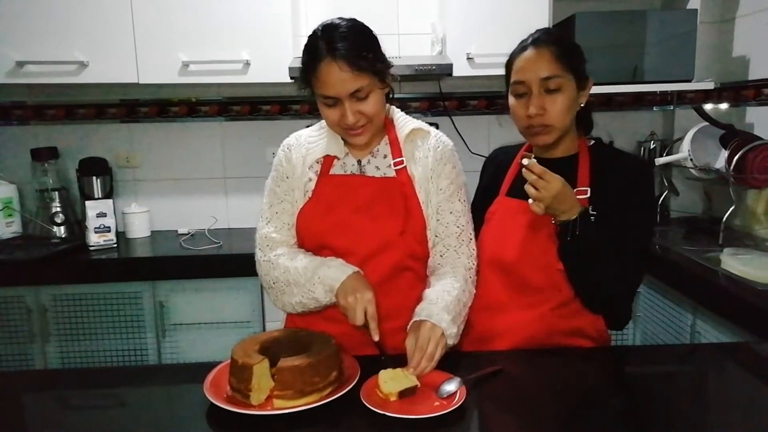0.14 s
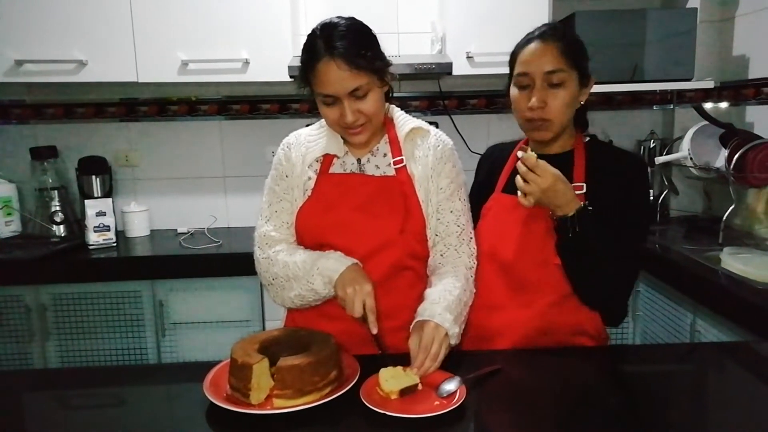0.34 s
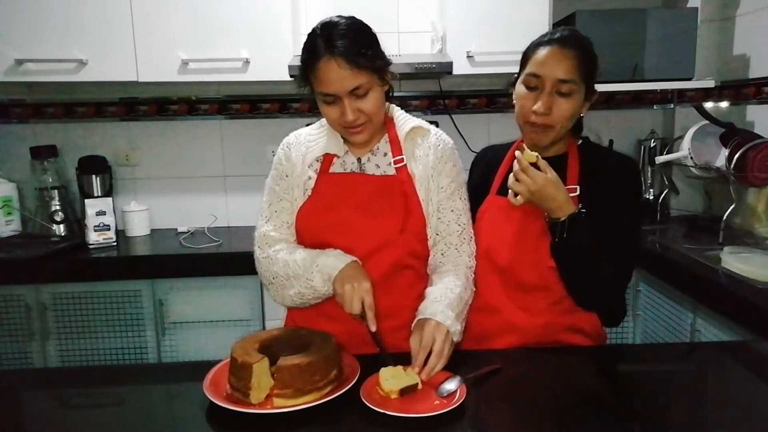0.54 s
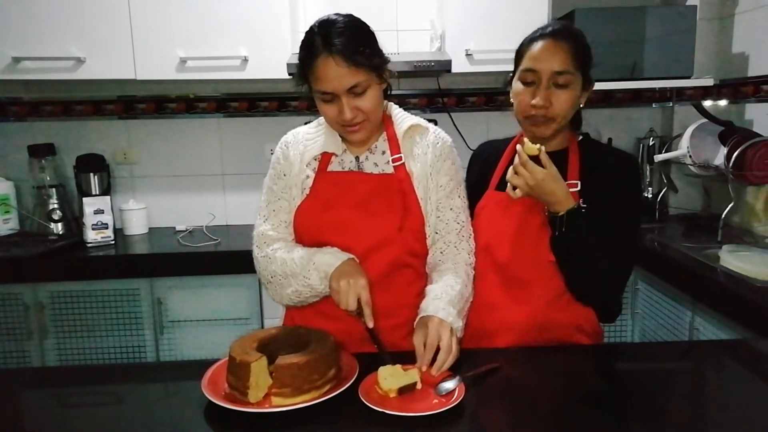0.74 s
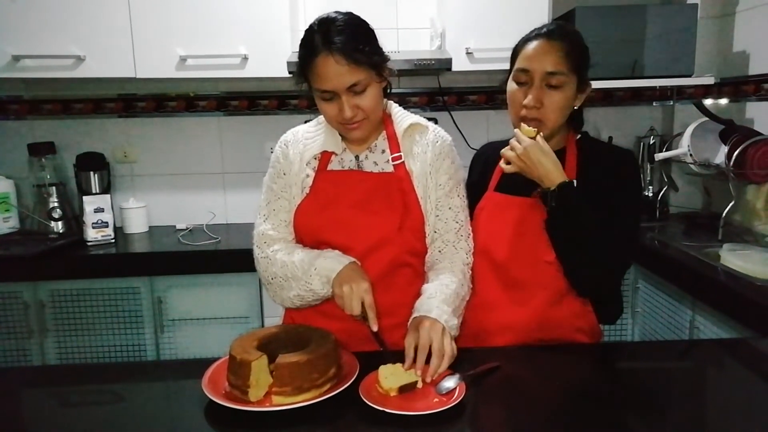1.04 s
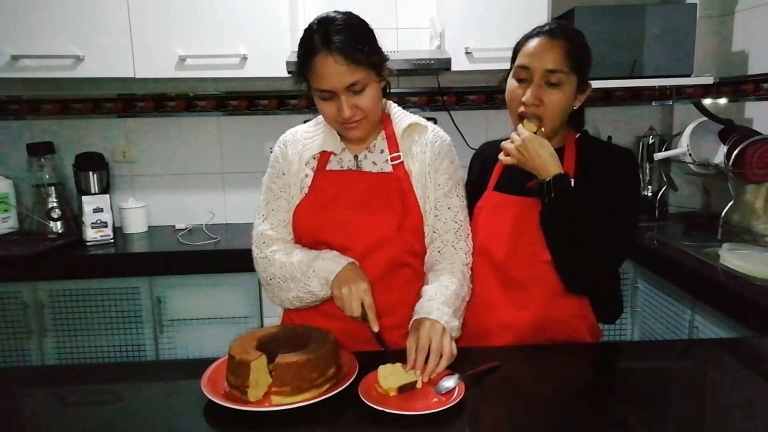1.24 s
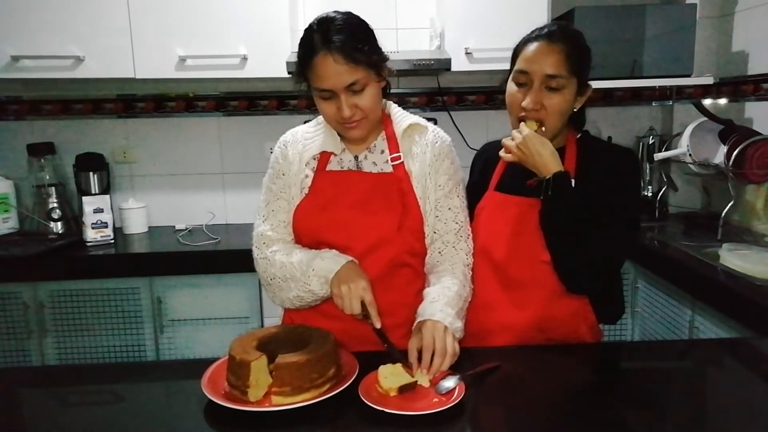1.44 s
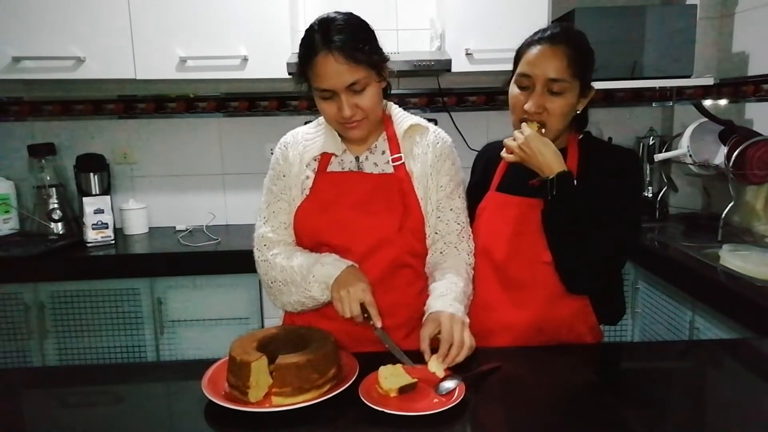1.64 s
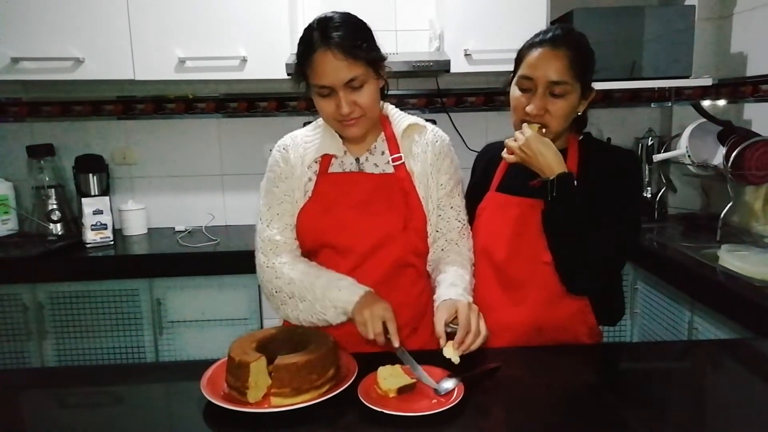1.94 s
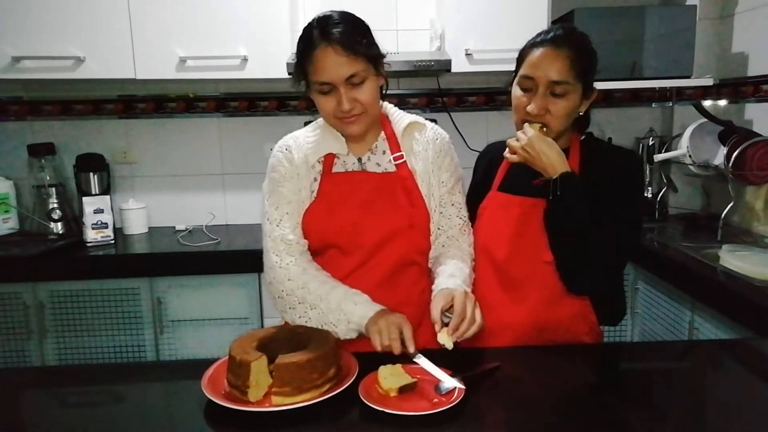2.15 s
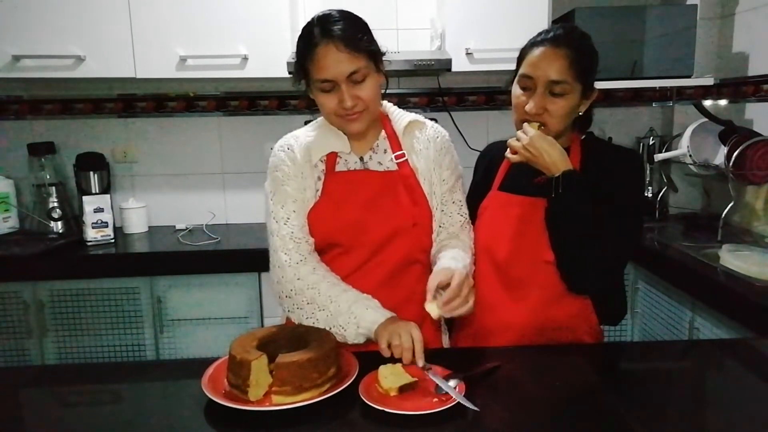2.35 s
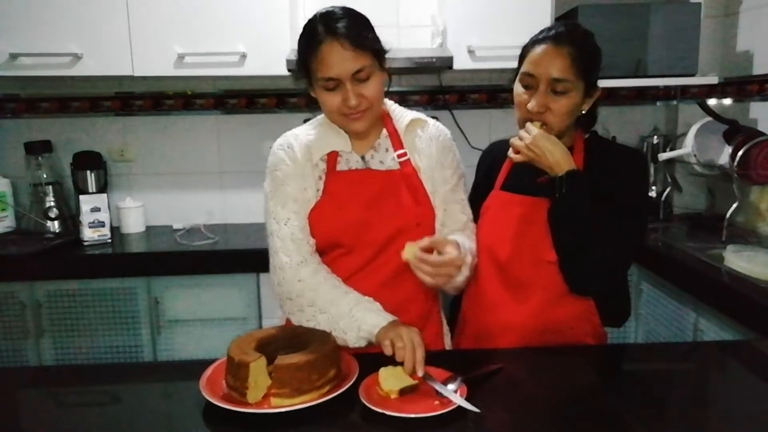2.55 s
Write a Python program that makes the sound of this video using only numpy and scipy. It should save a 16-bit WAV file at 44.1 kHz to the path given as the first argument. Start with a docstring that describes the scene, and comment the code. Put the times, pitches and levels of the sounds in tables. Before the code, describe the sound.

A metal knife clinks on a ceramic plate, its ring already fading at the start. A sharp clack lands at 0.25 seconds, with lighter touches near 0.5. Soft counter bumps come around 0.6, 0.8, 1.9 and 2.1, and tiny high ticks from 1.0 to 1.3. A bright, quick clatter strikes at 2.33, then a faint touch. Short tiled-kitchen reverberation, quiet hiss and low hum; left side duller.

```python
"""A ceramic plate is already ringing from knife strikes, over a quiet kitchen hiss, rumble and hums.
The knife goes on cutting cake: strikes, light touches and a lay across the plate, each a noise crack
with dying sine modes. Thin ticks are short sine clicks; soft counter bumps pair a knock with a low boom.
A tiled room adds sparse reflections. Of two spaced microphones, the left is farther from the plate
and muffled in the treble."""
import sys
import numpy as np
from scipy import signal
from scipy.fft import rfft, irfft, next_fast_len
from scipy.io import wavfile
from scipy.ndimage import uniform_filter1d

SR = 44100
rng = np.random.default_rng(int(sys.argv[2]) if len(sys.argv) > 2 else 0)


def pcm_store(signal):
    """Save signal as 16-bit PCM."""
    levels = np.round(np.clip(np.atleast_2d(signal), -1, 1) * 32767)
    wavfile.write(sys.argv[1], SR, levels.astype(np.int16).T)


N = 119070  # samples heard
LEAD = 13230  # samples of run-up, so earlier strikes are still ringing at the start

# Plate and blade modes: mode_hz
MODE_HZ = [390, 690, 930, 1415, 1910, 2060, 2270, 2540, 3015, 3080, 3440, 3650, 4130, 4225, 4295, 4430,
           4950, 5320, 5720, 5785, 5850, 6340, 6610, 6705, 7140, 7400, 8075, 8200, 8565, 8900, 9180, 9470,
           10400, 11100, 11900, 12700, 13100, 13550, 14800]
# Excitation and decay of each mode: centre_strike_db, rim_strike_db, t60_s (before the cap below)
MODE_STRIKES = [(-51, -22, 0.027), (-16, -31, 0.12), (-12.5, -27, 0.0083), (-22, -8.5, 0.089),
                (-4.5, -14, 0.066), (-17.5, 6.5, 0.034), (-11, -3, .07), (-9.5, -24.5, .06),
                (-2.5, -18.5, 0.16), (-3, -12, .09), (-5.5, -4.5, .08), (-6, -12, .06), (6, -14, 0.028),
                (-5, -5, .1), (-3.5, -10, 0.074), (-3.5, -44, .08), (-18.5, -47, .06), (-2, -14, .07),
                (0, -1.5, .08), (2, -9.5, 0.054), (-3.5, -12, 0.1), (-21, -53, .06), (-8, 1, .08),
                (-11, -15.5, .1), (-14, -18, 0.037), (8.5, -0.5, 0.031), (-22.5, -8, 0.039), (8, -1.5, .1),
                (-13.5, -7, 0.064), (-13.5, 3, .08), (5.5, 2, 0.027), (-38, -14, 0.058), (-8, -27, .05),
                (-6, -14.5, 0.054), (-7, -10, 0.047), (-18, -16, .04), (-15, -11, 0.046), (-32, -26, .03),
                (-29, -8, 0.062)]
# Excitation of each mode with the blade pressed through cake: pressed_db
MODE_PRESSED_DB = [-36, -18, -26, -18, -14, -5, -7.5, -16, -8, -6, -6, -16, -22, -18, -22, -22, -18, -4.5,
                   -5.5, -6, -11.5, -22.5, -22, -20, -24, -22, -7, -3.5, -6, -7, -9, -18, -26, -24, -28,
                   -28, -28, -32, -32]
# Knife on plate: start_s, level_db, contact_place (0 centre, 1 rim, 2 pressed), favoured_hz,
# fall_db (per octave away from favoured_hz), crack_db (relative to level_db)
KNIFE_BLOWS = [(-.06, -23.5, .1, 700, 11.5, -7.5), (-.12, -32, 2, 5500, 0, 4),
               (.026, -47.5, 1.45, 4000, 2.5, 3), (.155, -54.5, 1.6, 7200, 3, -8),
               (.2443, -20, 0.014, 4000, 3.4, 12), (.2475, -30, 0.3, 7400, -1, 13),
               (.5157, -46.5, 0.46, 2520, 11, 11), (.5566, -43.5, 0.33, 2300, 7.5, -12),
               (.7642, -60.5, 0.35, 4000, 5.5, 6), (2.3285, -27.5, 0.76, 4430, 1, 9),
               (2.3341, -23, 0.45, 8000, 0.1, 14), (2.3365, -29.5, .99, 8700, 1, -16),
               (2.345, -31, 0.82, 3430, 1.5, 16.5), (2.475, -37, 0.41, 4400, 16, -9),
               (2.578, -63, 0.32, 4020, 12, 14)]
# Colour of the contact crack: pitch_hz, level_db
CRACK_COLOUR = [(250, -33), (450, -21.5), (700, -17), (1000, -11), (1300, -17), (1900, -5.5), (3000, -5.5),
                (6000, -6.5), (9000, 4.5), (10200, -17.5), (13000, -15.5), (15500, -28.5)]
LONGEST_T60_S, CRACK_T60_S, RISE_S = .1, 0.01, 0.0008

# Reverberation of the tiled kitchen: pitch_hz, t60_s
KITCHEN_DECAY = [(500, 0.84), (1300, 0.59), (3500, 0.5), (6500, 0.49), (9200, 0.38), (14000, 0.32)]
PLATE_ROOM_DB, TICK_ROOM_DB, KNOCK_ROOM_DB = 0, -5.5, -11.5  # sends into the room
ROOM_GAP_S = .003  # silence before the first reflection

# Treble muffling and tone of the left microphone: pitch_hz, level_db
LEFT_TONE = [(300, -6.1), (800, -5.5), (1500, -4), (2500, -6.5), (4400, 1.6), (6000, -1), (7200, -13.5),
             (8200, -17), (10000, -34), (12500, -19), (15500, -11)]
MIC_LAG = 26  # samples: plate and ticks late at the left, knocks late at the right
KNOCK_LEFT_DB = -0.5

# Spectrum of the room hiss before its overall level is set: pitch_hz, density_db (per Hz)
AIR_SPECTRUM = [(15, -28.5), (25, -2.5), (45, -2.5), (62, -5), (85, -14), (105, -15.5), (140, -10.5),
                (170, -20.5), (250, -18), (310, -15.5), (400, -21), (600, -24.5), (950, -24.5), (1550, -25),
                (2100, -28), (5000, -28.5), (7000, -30), (8500, -27), (10000, -33), (12500, -35),
                (14000, -47), (15800, -71)]
# Left-right likeness of the hiss: pitch_hz, correlation (-1 to 1)
AIR_LIKENESS = [(60, 1), (99, -0.34), (160, 0.96), (270, 0.42), (450, -0.9), (740, -0.3), (1220, 0.19),
                (2010, 0.092), (3330, 0.2), (5500, -0.088), (9080, 0.01), (15000, -0.18)]
# Balance of the hiss: pitch_hz, left_minus_right_db
AIR_BALANCE = [(60, -1.5), (120, 4.5), (240, -0.5), (480, 2.5), (950, 0), (1890, -1), (3770, 1),
               (7520, -2.5), (15000, 1.5)]
AIR_DB, PATCHY_DB = -59.5, 1.3

# Level of the deepest rumble: time_s, level_db
RUMBLE_LEVEL = [(0.0, -44), (0.04, -46), (0.13, -50.5), (0.2, -59), (0.62, -60), (0.7, -76), (2.65, -62),
                (2.7, -55.5)]
# Level of the low hum: time_s, level_db
HUM_LEVEL = [(0.0, -67), (.5, -68.5), (.8, -75.5), (1.24, -72.5), (1.5, -66.5), (1.9, -65.5), (2.0, -81),
             (2.15, -67), (2.7, -68.5)]
# Level of the fainter drone: time_s, level_db
DRONE_LEVEL = [(0.0, -55.5), (0.16, -74), (0.85, -68), (0.92, -81), (2.55, -73.5), (2.7, -103)]
HUM_HZ, DRONE_HZ, HUM_WIDTH_HZ = 137, 199.6, 10

# Bumps on the counter, left of the microphones: start_s, boom_db, boom_hz, knock_db,
# knock_tilt_db (per octave)
COUNTER_BUMPS = [(.054, -34, 94, -46.5, -6), (0.575, -49.5, 62, -46.5, -6), (.832, -43.5, 89, -43.5, 2),
                 (1.868, -44, 112.3, -64, -3), (2.136, -47.5, 123.6, -58.5, -6)]
# Modes of the knock: mode_hz, level_db (before tilt), t60_s (before the hold swells it)
KNOCK_MODES = [(308.8, -4.5, 0.05), (487, 1, 0.039), (972, -5, 0.041), (1367, -12.5, .03)]
BOOM_LAG_S, BOOM_WIDTH_S, KNOCK_HOLD_S = .02, 0.0073, 0.014

# Thin high ticks: start_s, level_db, pitch_hz, bounce_after_s, bounce_db (relative to the click)
HIGH_TICKS = [(1.0106, -35, 9030, .0045, -4.5), (1.147, -45, 8630, .0042, 2.5),
              (1.2698, -58, 8200, .003, -10)]
TICK_WIDTH_S = 0.00032

GATE_DB, GATE_DEPTH_DB, GATE_SOFT_DB, GATE_S = -56, 5, 2., .03
CEILING, EDGE_HZ = .95, 15900  # peak limit of the squeeze, top of the band


def amp(db):
    """Turn decibels into a linear gain."""
    return 10 ** (np.asarray(db) / 20)


def evened(x):
    """Bring a signal to an RMS of one."""
    return x / np.sqrt(np.mean(x ** 2) + 1e-20)


def read(points, hz):
    """Read a curve between its points on a log frequency scale."""
    f, value = np.transpose(points)
    return np.interp(np.log(hz + 1), np.log(f + 1), value)


def along(points):
    """Draw a gain curve over time, straight in dB between its points."""
    s, db = np.transpose(points)
    return amp(np.interp(np.arange(N) / SR, s, db))


def add(mix, s, sound):
    """Lay a sound into a mix, s seconds after the run-up ends."""
    part = mix[LEAD + round(s * SR):][:len(sound)]
    part += sound[:len(part)]


def coloured(x, points):
    """Equalise a sound with a curve of dB over frequency."""
    size = next_fast_len(len(x))
    gain = amp(read(points, np.fft.rfftfreq(size, 1 / SR)))
    return irfft(rfft(x, size) * gain, size)[:len(x)]


def ring(hz, db, t60, t, phase):
    """Sum sines that die exponentially, one per mode; phase is in cycles."""
    decay = amp(db[:, None] - 60 * t / t60[:, None])
    return (decay * np.sin(2 * np.pi * (hz[:, None] * t + phase[:, None]))).sum(0)


def plate_blow(level_db, place, favoured_hz, fall_db, crack_db):
    """A short noise crack of contact, with the modes that this spot of the plate excites."""
    centre, rim, t60 = np.transpose(MODE_STRIKES)
    hz, t = np.array(MODE_HZ), np.arange(SR // 4) / SR
    # Slide from centre to rim, then from rim to pressed
    mode_db = centre + np.clip(place, 0, 1) * (rim - centre)
    mode_db = mode_db + np.clip(place - 1, 0, 1) * (MODE_PRESSED_DB - rim)
    mode_db = mode_db - fall_db * abs(np.log2(hz / favoured_hz))
    modes = ring(hz, mode_db, np.minimum(t60, LONGEST_T60_S), t, rng.random(len(hz)))
    colour = [(f, d - fall_db * abs(np.log2(f / favoured_hz))) for f, d in CRACK_COLOUR]
    noise = evened(coloured(rng.standard_normal(len(t)), colour))
    crack = noise * amp(crack_db - 60 * t / CRACK_T60_S)
    return amp(level_db) * np.minimum(t / RISE_S, 1) * (modes + crack)


def kitchen(x):
    """Sparse reflections of random sign, each band dying at its own speed."""
    slots = np.arange(0, SR - 20, 20)
    taps = np.zeros((2, SR))
    # One reflection at a random spot in every 20 samples, drawn apart for each microphone
    spots = slots + rng.integers(0, 20, (2, len(slots)))
    signs = rng.choice([-1., 1.], (2, len(slots)))
    np.put_along_axis(taps, spots, signs, 1)
    taps[:, :round(ROOM_GAP_S * SR)] = 0
    hz, t, bands = signal.stft(taps, SR, nperseg=128)
    decay = amp(-60 * t / read(KITCHEN_DECAY, hz)[:, None])
    tail = signal.istft(bands * decay, SR, nperseg=128)[1]
    return signal.fftconvolve(x[None], tail / np.linalg.norm(tail[0]), axes=1)[:, :len(x)]


def air():
    """Steady room noise with faint patches; its left-right likeness varies with frequency."""
    frames, hz = N // 512 + 5, np.fft.rfftfreq(2048, 1 / SR)
    a, b, c, d, patches = rng.standard_normal((frames, 1025, 5)).T
    # Smooth the patches across frequency, then time
    patches = uniform_filter1d(uniform_filter1d(patches, size=16, axis=0), size=6, axis=1)
    patches = evened(patches)
    same = np.clip(read(AIR_LIKENESS, hz), -1, 1)[:, None]
    left = a + 1j * b
    right = same * left + np.sqrt(1 - same ** 2) * (c + 1j * d)
    half = read(AIR_BALANCE, hz)[:, None] / 2
    shape_db = read(AIR_SPECTRUM, hz)[:, None] + PATCHY_DB * patches
    spectrum = np.array([left, right]) * amp(shape_db + np.array([half, -half]))
    return amp(AIR_DB) * evened(signal.istft(spectrum, nperseg=2048, noverlap=1536)[1][:, :N])


def lows():
    """Band-passed noise as a deep rumble, plus a hum and a drone, the same in both microphones."""
    band = signal.butter(2, [18, 45], "bandpass", fs=SR, output="sos")
    rumble = along(RUMBLE_LEVEL) * evened(signal.sosfilt(band, rng.standard_normal(N)))
    hum = along(HUM_LEVEL) * wavering(HUM_HZ)
    drone = along(DRONE_LEVEL) * wavering(DRONE_HZ)
    return rumble + hum + drone


def wavering(hz):
    """A fuzzy tone: slow complex noise shifted up into a narrow band around hz."""
    b, c = rng.standard_normal((2, N))
    drift = signal.lfilter([1], [1, -np.exp(-np.pi * HUM_WIDTH_HZ / SR)], b + 1j * c)
    return evened((drift * np.exp(2j * np.pi * hz * np.arange(N) / SR)).real)


def counter_bump(boom_db, boom_hz, knock_db, tilt_db):
    """A wooden knock of dying modes, and a short low boom under a bell-shaped swell."""
    t = np.arange(SR // 4) / SR
    hz, db, t60 = np.transpose(KNOCK_MODES)
    since_peak = t - BOOM_LAG_S
    swell = np.exp(-.5 * (since_peak / BOOM_WIDTH_S) ** 2)
    boom = amp(boom_db) * swell * np.sin(2 * np.pi * boom_hz * since_peak + 2.8)
    onset = np.sin(np.pi / 2 * np.minimum(t / .006, 1)) ** 2
    held = (1 + t / KNOCK_HOLD_S) ** 2 * onset
    knock = amp(knock_db) * held * ring(hz, db + tilt_db * np.log2(hz / 490), t60, t, 0 * hz)
    return boom, knock


def tick(level_db, hz, bounce_s, bounce_db):
    """A tiny bright click, a sine in a bell-shaped envelope, and its bounce."""
    t = np.arange(1024) / SR
    envelope = np.exp(-.5 * (t / TICK_WIDTH_S - 2) ** 2)
    click = amp(level_db) * envelope * np.sin(2 * np.pi * hz * t)
    return click + amp(bounce_db) * np.roll(click, round(bounce_s * SR))


def scene():
    """Place every contact, add the room, and pick it all up at two microphones."""
    plate, ticks, booms, knocks = np.zeros((4, LEAD + N))
    for s, *row in KNIFE_BLOWS:
        add(plate, s, plate_blow(*row))
    for s, *row in HIGH_TICKS:
        add(ticks, s, tick(*row))
    for s, *row in COUNTER_BUMPS:
        boom, knock = counter_bump(*row)
        add(booms, s, boom)
        add(knocks, s, knock)
    send = amp(PLATE_ROOM_DB) * plate + amp(TICK_ROOM_DB) * ticks + amp(KNOCK_ROOM_DB) * knocks
    direct = plate + ticks
    left, right = np.array([np.roll(direct, MIC_LAG), direct]) + kitchen(send)
    left = coloured(left, LEFT_TONE) + amp(KNOCK_LEFT_DB) * knocks
    right = right + np.roll(knocks, MIC_LAG)
    return (np.array([left, right]) + booms)[:, LEAD:] + air() + lows()


def record(dry):
    """A soft gate lifts loud treble above quiet treble; peaks are squeezed; then the band limit."""
    treble_filter = signal.firwin(255, 900, pass_zero=False, fs=SR)
    treble = signal.oaconvolve(dry, treble_filter[None], "same")
    power = uniform_filter1d((treble ** 2).mean(0), round(GATE_S * SR))
    power_db = 10 * np.log10(abs(power) + 1e-12)
    opened = amp(GATE_DEPTH_DB / (1 + np.exp((GATE_DB - power_db) / GATE_SOFT_DB)))
    gated = CEILING * np.tanh((dry + (opened - 1) * treble) / CEILING)
    band_limit = signal.firwin(511, EDGE_HZ, window=("kaiser", 9), fs=SR)
    return signal.oaconvolve(gated, band_limit[None], "same")


dry = scene()
out = record(dry)
pcm_store(out)
```